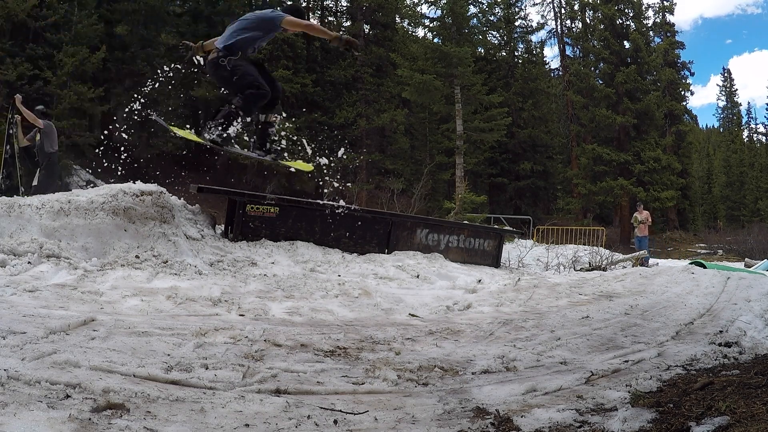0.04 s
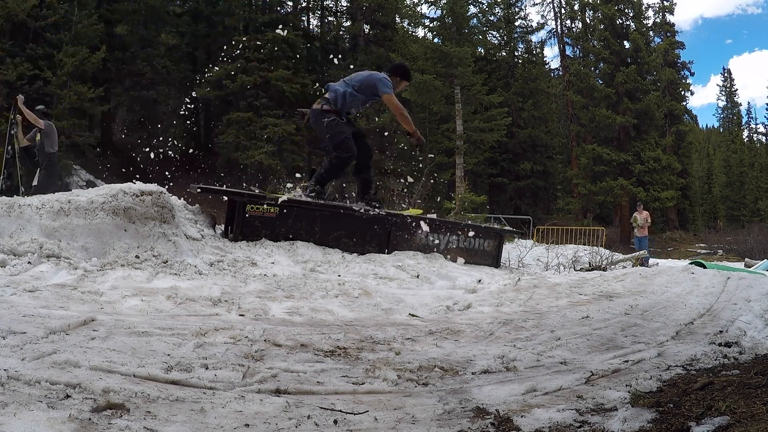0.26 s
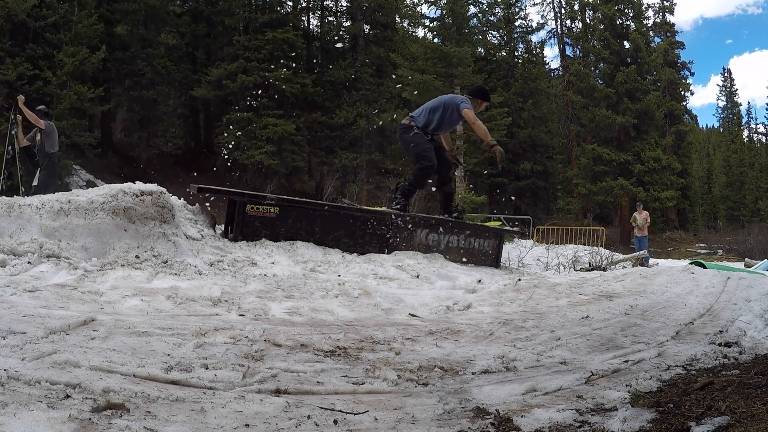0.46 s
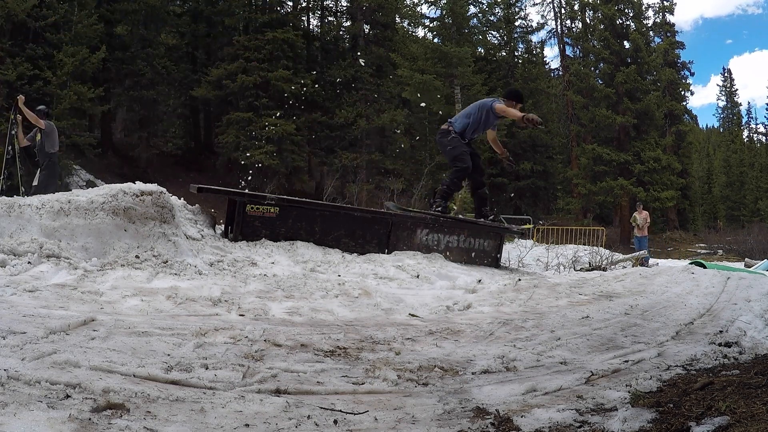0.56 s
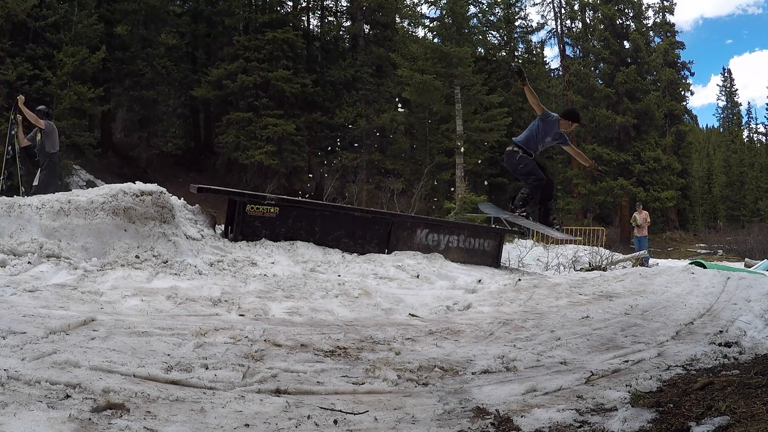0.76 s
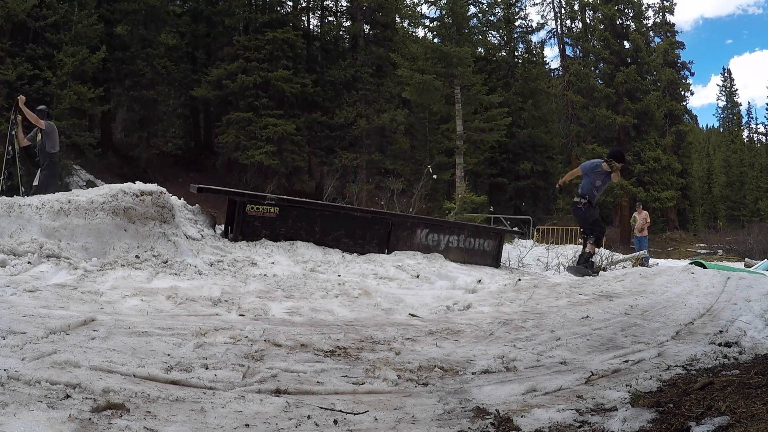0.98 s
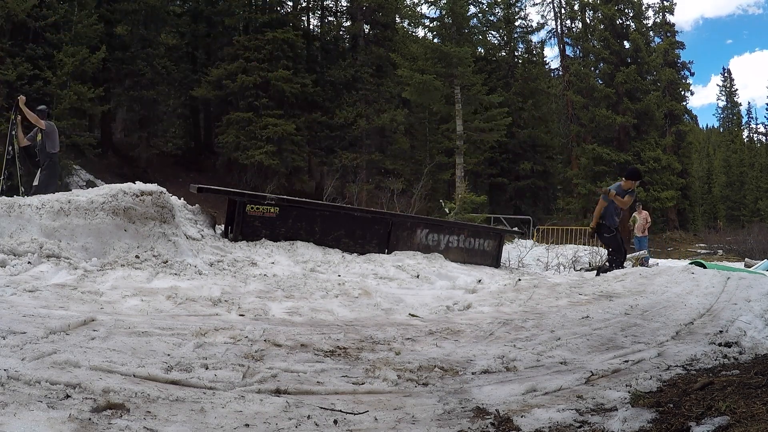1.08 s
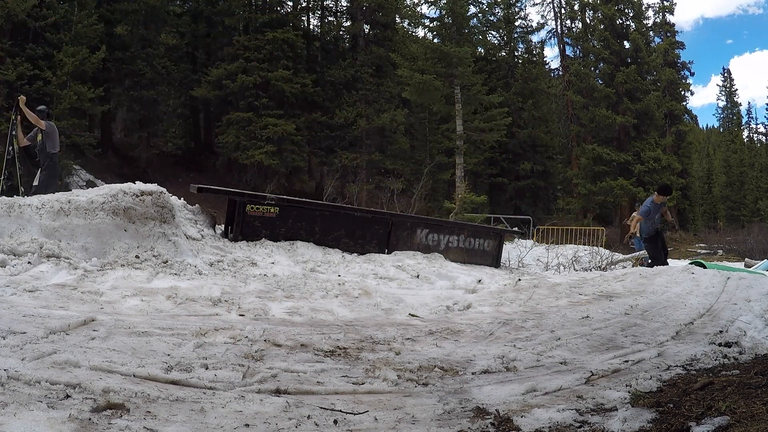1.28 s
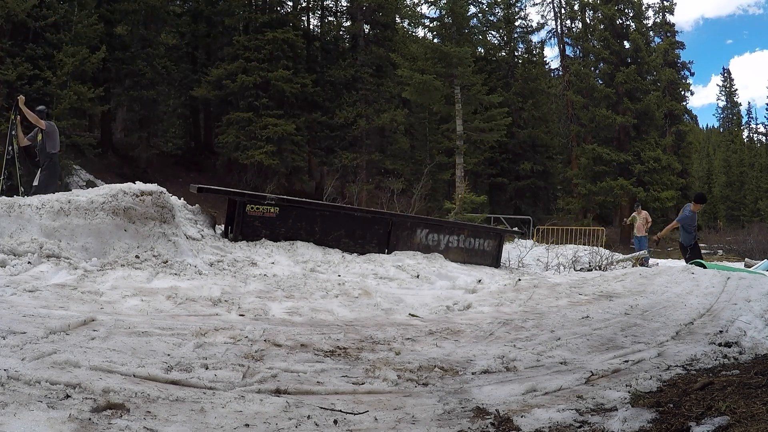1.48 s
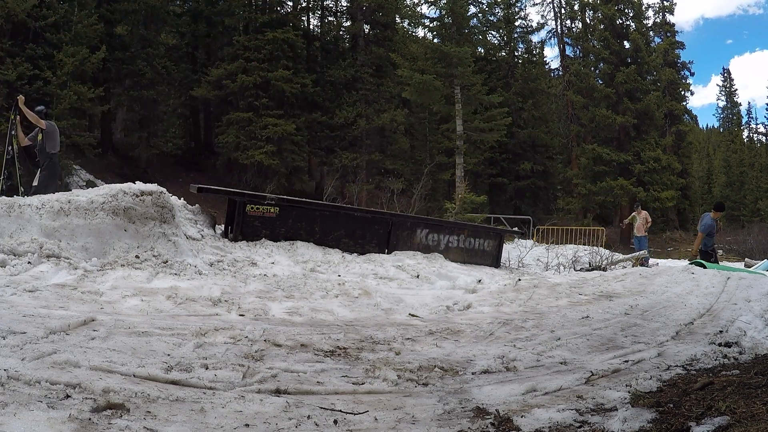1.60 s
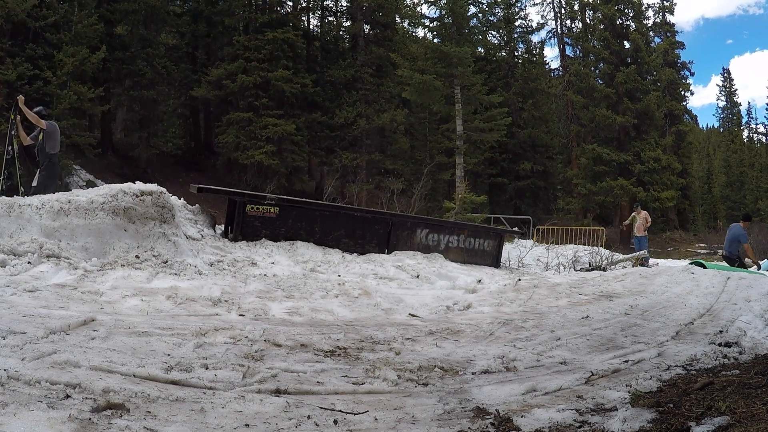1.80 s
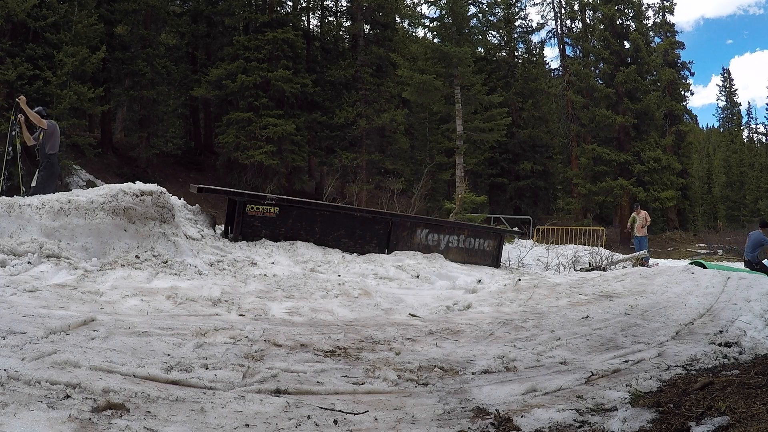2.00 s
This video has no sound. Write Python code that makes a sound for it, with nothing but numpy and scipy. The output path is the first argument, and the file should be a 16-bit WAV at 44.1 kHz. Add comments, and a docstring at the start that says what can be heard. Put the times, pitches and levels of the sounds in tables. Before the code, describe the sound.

A snowboard slaps onto a box at about 0.2 seconds with a sharp, briefly ringing knock and a deep boom, close by. It scrapes along with a bright chatter and ticks off the end at 0.7 seconds. Near 1.1 seconds it lands on snow with a soft thud and another boom, then hisses faintly away until 2 seconds. A low rumble swells and settles under steady outdoor air.

```python
"""Outdoors on wet snow, one microphone close to a long box, over steady air and a quiet rumble.
A snowboard slaps down on the box: both ring briefly and a deep boom goes through the ground.
The board scrapes along, ticks over the far end and drops onto the snow with a soft thud and a second boom.
It hisses away over the snow while the rumble swells and settles."""
import sys
import numpy as np
from scipy import signal
from scipy.fft import rfft, irfft
from scipy.io import wavfile

SR = 44100
rng = np.random.default_rng(int(sys.argv[2]) if len(sys.argv) > 2 else 0)


def unload_wav(signal):
    """Save mono or channel-first audio to the path in sys.argv[1] as 16-bit WAV at rate SR, clipped to [-1, 1]."""
    wavfile.write(
        sys.argv[1],
        SR,
        np.round(np.clip(np.atleast_2d(signal).T, -1, 1) * 32767).astype(np.int16),
    )


N = 90404
TIME = np.arange(N) / SR

# The board knocking on the box. Each row: start in seconds, levels of ring, crack and thud in dB,
# the crack's treble lift in dB, then hold and the crack's t60 in seconds.
KNOCKS = [(0.2322, -18, -19.5, -42.5, 0, 0.0025, .025), (0.3152, -48, -36, -49.5, 12.5, 0.0011, 0.014),
          (0.347, -47, -50, -62, 5, 0.0012, .018), (0.6828, -55, -41, -57, 8, .001, 0.012),
          (0.6896, -51, -43, -63, -3, .002, 0.024)]
# Colours of the crack and the thud. Each row: frequency in Hz, spectral density in dB.
CRACK_COLOUR = [(100, -11.5), (600, -14), (1150, -13), (1380, -26.5), (1650, -1.5), (2200, -5), (2800, 2),
                (3800, -1), (4200, -10.5), (5200, -11), (5850, -19.5), (6500, -12.5), (7400, -28),
                (10000, -37), (15000, -54)]
THUD_COLOUR = [(30, 4.5), (90, -7), (170, 6), (270, -8), (400, -4.5), (700, -19), (1500, -19), (5000, -60)]
def knocks():
    """Each knock of board on box reaches the microphone as a dry crack, a short ring and a hollow thud."""
    attack_s, treble_band_hz = .0011, (4170, 5200, 8500, 14000)
    out = np.zeros(N)
    for start, ring_db, crack_db, thud_db, lift_db, hold, crack_t60 in KNOCKS:
        ring, at = box_ring(), round(start * SR)
        out[at:at + len(ring)] += amp(ring_db) * ring * np.minimum(TIME[:len(ring)] / attack_s, 1)
        lift = [0, lift_db, lift_db, 0]
        crack = [(hz, db + np.interp(hz, treble_band_hz, lift)) for hz, db in CRACK_COLOUR]
        out += amp(crack_db) * burst(crack, start, attack_s, hold, crack_t60)
        out += amp(thud_db) * burst(THUD_COLOUR, start, attack_s, hold, t60=0.16)
    return out


# Modes of board and box. Each row: frequency in Hz, width in Hz before damping scales it, relative dB.
BOX_MODES = [(888, 54, -18), (1230, 50, -13.5), (1685, 54, -5.5), (1870, 57, -9.5), (2430, 34, -10.5),
             (2690, 78, -4.5), (3000, 44, -11), (3427, 48, -0.5), (3670, 46, -1.5), (3870, 55, -3.5),
             (4385, 53, -14.5), (5100, 170, -19), (6140, 65, -19), (8080, 84, -31)]
def box_ring(damping=0.86):
    """Board and box ring after one blow, the widest modes dying first; starts near rms 1."""
    hz, width, db = np.transpose(BOX_MODES)[:, :, None]
    t = TIME[:SR // 4]
    waves = np.sin(2 * np.pi * (hz * t + rng.random(hz.shape)))
    decay = np.exp(-np.pi * damping * width * t)
    return (amp(db) * decay * waves).sum(0) / np.sqrt(np.sum(amp(db) ** 2) / 2)


# Pressure of the board on the box, heard as scrape. Each row: time in seconds, level in dB.
SCRAPE_LEVEL = [(0.183, -100), (0.196, -55.5), (0.204, -43.5), (0.226, -44), (0.28, -43.5), (0.335, -46),
                (0.375, -45), (0.425, -47.5), (0.465, -47), (0.495, -52), (0.54, -51), (0.575, -46.5),
                (0.604, -53.5), (0.654, -47), (0.675, -49), (0.71, -43), (0.724, -54)]
# The scrape at the near and far ends of the box. Each row: frequency in Hz, spectral density in dB.
NEAR_COLOUR = [(100, -5), (600, -24), (1300, -20), (1650, -7), (2100, -11), (3050, -13.5), (3700, 0.5),
               (4150, -7), (4550, -10), (4900, -24), (5600, -18), (6300, -17.5), (6900, -20), (7700, -37),
               (8700, -41), (15000, -62)]
FAR_COLOUR = [(100, -6.5), (600, -34), (1400, -27), (1750, -10), (2100, -12.5), (2400, -0.5), (3400, -3.5),
              (4100, 1), (4550, -1), (4950, -8.5), (5700, -23), (6400, -17), (7700, -24), (8700, -40),
              (15000, -47)]
# The edge singing on the box. Each row: frequency and width in Hz, relative dB at the near and far ends.
EDGE_MODES = [(3407, 37, -8.5, -16), (3720, 86, -7, -12.5), (4520, 106, -16.5, -7), (7420, 290, -30.5, -18)]
def scrape():
    """The chattering base rubs the box and keeps it ringing; the colour shifts towards the far end."""
    chatter_hz, chatter_db = 110, 1.5
    leave_s, leave_t60_s = 0.7283, 0.016
    chatter = noise([(1, 0), (chatter_hz, 0), (2 * chatter_hz, -40)])
    rub = grit(per_s=2500, spread_db=3, smooth=0.65) * amp(chatter_db * chatter)
    along = np.interp(TIME, (0.28, .6), [0, 1])  # 0 at the near end, 1 at the far end
    ring = unit(signal.fftconvolve(rub, box_ring())[:N])
    near = colour(rub, NEAR_COLOUR) + amp(-7.5) * ring
    far = colour(rub, FAR_COLOUR)
    edge = sum(amp(near_db + (far_db - near_db) * along) * resonate(rub, hz, width)
               for hz, width, near_db, far_db in EDGE_MODES)
    contact = np.exp(-np.log(1000) * np.maximum(TIME - leave_s, 0) / leave_t60_s)
    return level(SCRAPE_LEVEL) * contact * unit((1 - along) * near + along * far + edge)


# The two landings, heard through the ground. Each row: start in seconds, level in dB, resting pitch
# and starting excess in Hz, rise, hold and t60 in seconds, relative level of the octave in dB.
BOOMS = [(0.244, -33.5, 39.44, 21.2, 0.029, 0.045, 0.73, -11),
         (1.086, -29.5, 39.4, 2.6, 0.016, 0.036, 0.26, -37)]
def ground_booms(settle_s=0.044):
    """The rider's weight sets off a deep wobble that sags to its resting pitch."""
    out = np.zeros(N)
    for start, db, hz, excess_hz, rise, hold, t60, octave_db in BOOMS:
        t = np.maximum(TIME - start, 0)
        phase = 2 * np.pi * (hz * t + excess_hz * settle_s * (1 - np.exp(-t / settle_s)))
        octave = amp(octave_db) * envelope(start, rise, hold, t60 / 2) * np.sin(2 * phase)
        out += amp(db) * (envelope(start, rise, hold, t60) * np.sin(phase) + octave)
    return out


# Snow crushed on the box, then on the ground.
# Each row: start in seconds, level in dB, then rise, hold and t60 in seconds.
CRUNCHES = [(0.194, -52.5, .006, 0.036, 0.15), (1.053, -49, 0.0089, 0.0087, 0.12)]
# The board running on snow, fading into the distance. Each row: time in seconds, level in dB.
GLIDE_LEVEL = [(0, -65.5), (0.15, -71), (0.8, -71), (1.025, -73), (1.06, -55), (1.09, -63), (1.2, -63.5),
               (1.3, -69), (1.55, -69.5), (1.8, -73), (2.05, -72)]
# Colours of crushed snow and of the glide. Each row: frequency in Hz, spectral density in dB.
CRUNCH_COLOUR = [(30, -8), (90, 1), (200, 5), (350, -9), (620, -8), (900, -15), (1500, -37), (5000, -55)]
GLIDE_COLOUR = [(200, -18), (1300, -25), (1650, -7), (2100, -16), (2900, -6), (3450, 0), (3750, 1),
                (4100, -8.5), (4550, -8), (5500, -16), (7000, -17.5), (9000, -27), (15000, -34)]
def snow():
    """Soft thuds of crushed snow, and the grainy hiss of the board running over it."""
    thuds = sum(amp(db) * burst(CRUNCH_COLOUR, start, rise, hold, t60)
                for start, db, rise, hold, t60 in CRUNCHES)
    hiss = colour(grit(per_s=2000, spread_db=2, smooth=0.99), GLIDE_COLOUR)
    return thuds + level(GLIDE_LEVEL) * hiss


# Open air and rumble around the microphone. Each row: frequency in Hz, spectral density in dB.
AIR_COLOUR = [(20, -17), (150, 1), (300, -0.5), (500, -3.5), (1300, -8.5), (2500, -8), (4500, -9.5),
              (6500, -15), (9000, -17), (15000, -21.5)]
RUMBLE_COLOUR = [(10, -10), (25, -7.5), (38, -1), (60, -8), (100, -14.5), (170, -21), (300, -33.5),
                 (1000, -51), (4000, -80)]
def outdoors(runout_s=1.08, rise_s=0.22, settle_s=0.42):
    """Steady air, and a low rumble that swells by about 6 dB while the board runs out."""
    since = np.maximum(TIME - runout_s, 0)
    swell_db = 10 * np.minimum(since / rise_s, 1) * np.exp(-since / settle_s)
    return amp(-64.5) * noise(AIR_COLOUR) + amp(-59 + swell_db) * noise(RUMBLE_COLOUR)


def grit(per_s, spread_db, smooth):
    """Friction: tiny catches of uneven size over smooth rubbing."""
    size = amp(spread_db * np.minimum(rng.exponential(1, N), 4))
    catches = size * rng.choice([-1, 1], N) * (rng.random(N) < per_s / SR)
    return unit(unit(catches) + smooth * rng.standard_normal(N))


def burst(points, start, rise, hold, t60):
    """A short, dense impact with an even spectrum of the given colour."""
    shape = envelope(start, rise, hold, t60)
    phases = np.angle(rfft(shape * rng.standard_normal(N)))
    even = irfft(np.exp(1j * phases), N)
    onset = np.clip((TIME - start) / rise, 0, 1)
    return unit(colour(even, points) * onset) * np.sqrt(np.mean(shape ** 2))


def envelope(start, rise, hold, t60):
    """Linear attack, hold, exponential release."""
    t = TIME - start
    return np.clip(t / rise, 0, 1) * np.exp(-np.log(1000) * np.maximum(t - rise - hold, 0) / t60)


def resonate(x, hz, width):
    """One narrow resonance; rms 1."""
    return unit(signal.lfilter(*signal.iirpeak(hz, hz / width, SR), x))


def colour(x, points):
    """Filters by a spectrum of (Hz, dB) points; rms 1."""
    hz, db = np.transpose(points)
    gain = amp(np.interp(np.log(np.fft.rfftfreq(N, 1 / SR) + 1), np.log(hz), db))
    return unit(irfft(rfft(x) * gain, N))


def noise(points):
    """Steady coloured noise."""
    return colour(rng.standard_normal(N), points)


def level(points):
    """Gain along a curve of (s, dB) points."""
    return amp(np.interp(TIME, *np.transpose(points)))


def amp(db):
    """Decibels to gain."""
    return 10 ** (np.asarray(db) / 20)


def unit(x):
    """Scales to rms 1."""
    return x / np.sqrt(np.mean(x ** 2) + 1e-20)


def scene():
    """All sources at one microphone."""
    return (knocks() + scrape() + ground_booms() + snow() + outdoors())[None]


def record(dry):
    """The recorder's band limit, at 15.4 kHz."""
    lowpass = signal.firwin(511, 15400, window=("kaiser", 9), fs=SR)
    return signal.oaconvolve(dry, lowpass[None], "same")


dry = scene()
out = record(dry)
unload_wav(out)
```